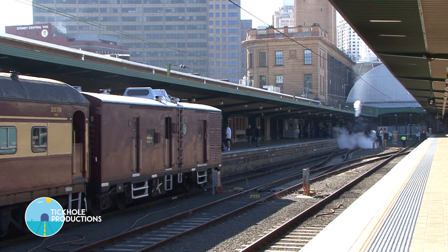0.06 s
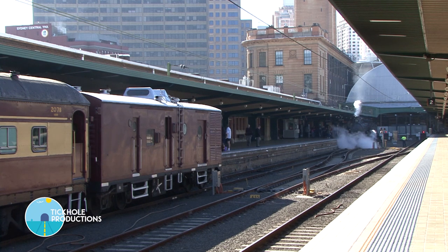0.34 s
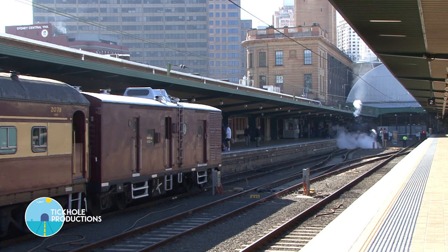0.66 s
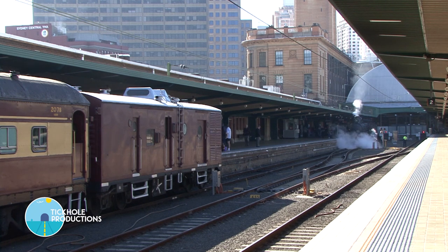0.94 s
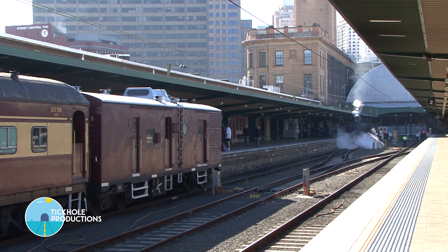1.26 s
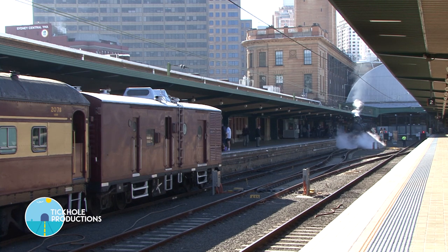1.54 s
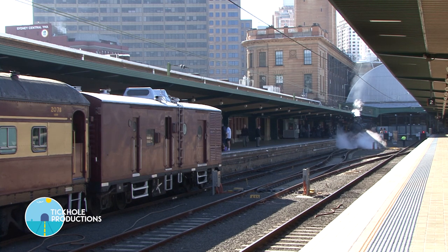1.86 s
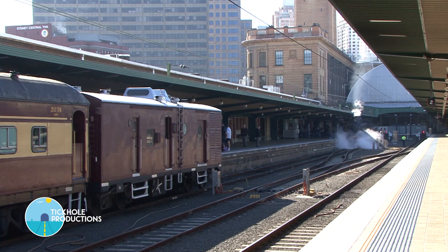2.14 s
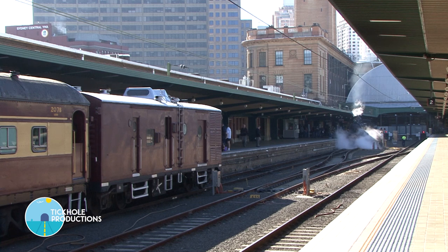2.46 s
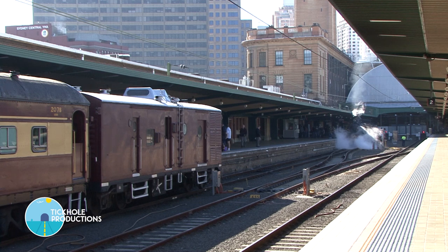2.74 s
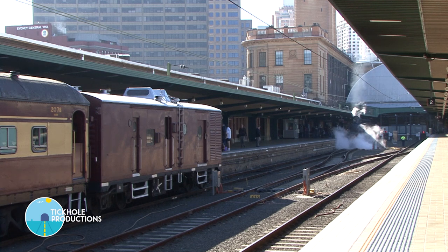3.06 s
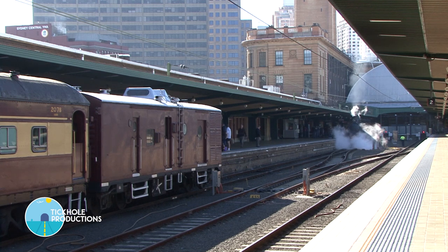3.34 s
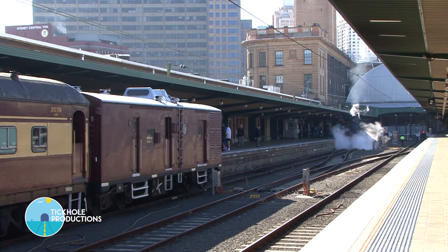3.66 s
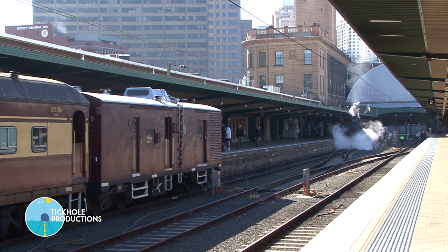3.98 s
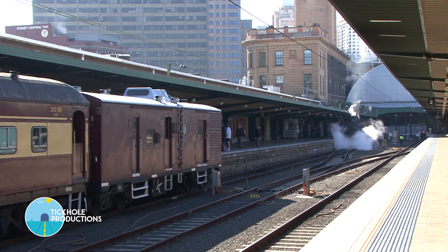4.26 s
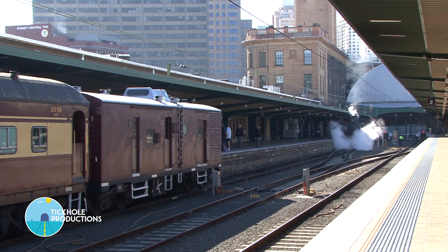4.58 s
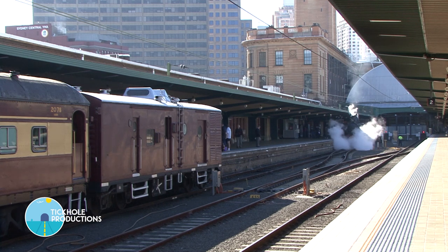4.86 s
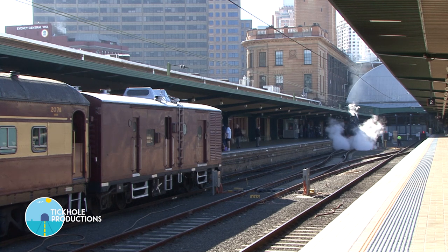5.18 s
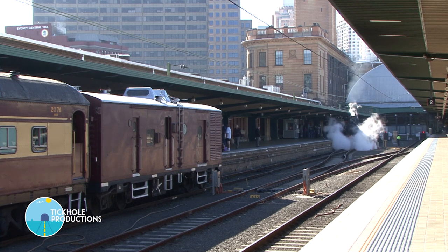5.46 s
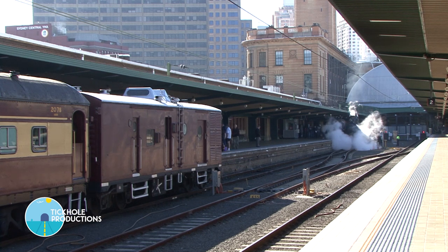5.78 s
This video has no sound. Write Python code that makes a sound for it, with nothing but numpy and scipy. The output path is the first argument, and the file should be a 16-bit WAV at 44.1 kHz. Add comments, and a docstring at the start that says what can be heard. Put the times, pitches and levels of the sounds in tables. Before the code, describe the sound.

A steam locomotive hisses steadily some way off over a dull station roar, with a few soft knocks and short squeals.

```python
"""A hiss of steam is heard first: a locomotive some way off creeps along a platform, cylinder drains open.
The turbulent jet excites outlet resonances that shift, swell and fade in turn, over the dull roar and
electrical hum of the station. Short squeals, soft knocks of the running gear and puffs of wind on the
microphone follow. Near two seconds a thin whistle swells once, then fine spray bursts out twice."""
import sys
import numpy as np
from scipy import signal
from scipy.fft import rfft, irfft, next_fast_len
from scipy.io import wavfile

SR = 44100
rng = np.random.default_rng(int(sys.argv[2]) if len(sys.argv) > 2 else 0)


def store_pcm(level_fs):
    """Save levels as 16-bit WAV."""
    pcm = np.round(np.clip(level_fs, -1, 1) * 32767).astype(np.int16)
    wavfile.write(sys.argv[1], SR, np.atleast_2d(pcm).T)


N = 256662
TIME = np.arange(N) / SR
FROM_MIDDLE_S = TIME - TIME.mean()


def from_db(db):
    """Amplitude ratio of a level in decibels."""
    return 10 ** (np.asarray(db) / 20)


def unit_rms(x):
    """Normalisation to unit mean power."""
    return x / np.sqrt(np.mean(x ** 2) + 1e-20)


def level_curve(rows):
    """Linear interpolation of (t/s, level/dB) rows at every sample."""
    return np.interp(TIME, *np.transpose(rows))


def swing_of(rows):
    """Deviation of a level curve from its mean, in dB."""
    level = level_curve(rows)
    return level - level.mean()


def swell(peak_s, length_s):
    """Gaussian envelope of height 1; the length is its full width at half height."""
    return .5 ** ((2 * (TIME - peak_s) / length_s) ** 2)


def noise(gain_at):
    """Spectral shaping: white noise weighted by a function of frequency, at unit rms."""
    size = next_fast_len(N)
    hz = np.arange(size // 2 + 1) * SR / size
    white = rfft(rng.standard_normal(size))
    return unit_rms(irfft(white * gain_at(hz), size)[:N])


def coloured(spectrum):
    """Noise shaped by (f/Hz, level/dB) rows, interpolated in log frequency."""
    points_hz, db = np.transpose(spectrum)
    return noise(lambda hz: from_db(np.interp(np.log(hz + 1), np.log(points_hz), db)))


def resonant(centre_hz, width_hz):
    """Narrow-band noise: two passes through one second-order resonance."""
    return noise(lambda hz: 1 / (1 + ((hz ** 2 - centre_hz ** 2) / (hz * width_hz + 1)) ** 2))


def drift(rate_hz):
    """Random fluctuation: low-pass noise of unit rms."""
    return noise(lambda hz: 1 / (1 + (hz / rate_hz) ** 2))


def gliding(centre_hz, width_hz):
    """Quadrature modulation: two slow noises on a moving carrier form a gliding band of noise."""
    phase = 2 * np.pi * np.cumsum(centre_hz) / SR
    return unit_rms(drift(width_hz / 2) * np.cos(phase) + drift(width_hz / 2) * np.sin(phase))


def split(x, centres_hz):
    """Complementary filter bank: overlapping bands that sum to the input."""
    size = next_fast_len(N)
    spectrum = rfft(x, size)
    log_hz = np.log(np.arange(size // 2 + 1) * SR / size + 1)
    weights = [np.interp(log_hz, np.log(centres_hz), row) for row in np.eye(len(centres_hz))]
    return [irfft(spectrum * weight, size)[:N] for weight in weights]


# Spectrum of the bare jet: f/Hz, relative density level/dB
JET_SPECTRUM = [(300, -36.5), (700, -20.5), (1100, -11.5), (1600, -7.5), (2650, -5), (3700, -1), (4800, -2),
                (6000, -2.2), (8000, -8), (10000, -16), (12500, -24.5), (14500, -32.5), (16000, -44)]
# Strength of the steam flow: t/s, relative level/dB
FLOW_LEVEL = [(0.06, -19), (1.0, -17), (1.85, -16.5), (2.4, -16.5), (2.53, -16), (3.83, -14), (4.82, -19),
              (5.13, -19), (5.82, -16.5)]
# Treble of the jet: t/s, relative level/dB
SIZZLE_LEVEL = [(0.0, -29), (0.31, -31.5), (1.0, -27), (2.3, -27.5), (2.63, -29), (3.34, -28), (3.79, -35),
                (4.03, -32.5), (4.93, -33), (5.27, -29), (5.66, -32), (5.82, -32)]
def jet(level_db=-19.5, trend_db_per_s=-0.35, body_hz=1200, hiss_hz=4800, sizzle_hz=10000):
    """Turbulent mixing radiates a broad hiss that follows the flow; moving air makes each band flutter."""
    body_db = 0.24 * swing_of(ROAR_LEVEL)   # the low bands rise and fall with the station's roar
    hiss_db = 0.9 * swing_of(FLOW_LEVEL)
    sizzle_db = 1.04 * swing_of(SIZZLE_LEVEL)
    surge_db = 0.45 * drift(22)
    centres_hz = np.geomspace(700, 14000, num=14)
    out = 0
    for hz, band in zip(centres_hz, split(coloured(JET_SPECTRUM), centres_hz)):
        low = np.interp(hz, [body_hz, hiss_hz], [1, 0])
        high = np.interp(hz, [hiss_hz, sizzle_hz], [0, 1])
        middle = min(1 - high, 1 - low / 2)
        swing_db = low * body_db + middle * hiss_db + high * sizzle_db
        flutter_db = 0.67 * np.sqrt(hz / hiss_hz) * drift(14)   # short waves are scattered most
        out = out + band * from_db(swing_db + surge_db + flutter_db)
    return from_db(level_db + trend_db_per_s * FROM_MIDDLE_S) * out


# Outlet resonances: f/Hz, bandwidth/Hz, base level at mid-scene/dB, trend as the engine creeps/(dB/s)
OUTLET_MODES = [(1901, 310, -31.7, 1.55), (2329, 450, -32.3, .2), (3160, 610, -26.6, .85),
                (3675, 690, -33, .5), (4424, 540, -27, 0.9), (5190, 490, -27.1, 0.4), (5956, 930, -30, 0)]
# The flow catches the nearest resonance: peak t/s, duration/s, f it is pulled to/Hz, lift/dB
MODE_SWELLS = [(.3, .5, 4480, 3.5), (.75, .65, 3060, 3.5), (1.35, .45, 3960, 7), (1.5, 0.69, 2761, 1),
               (1.25, .25, 5195, 3), (1.85, .55, 5140, 6.5), (1.88, .5, 5850, 7), (2.02, .35, 4220, 2),
               (2.501, .55, 2300, 6), (2.724, 0.53, 5190, 7), (2.868, .5, 4315, 5.6),
               (3.332, .3, 2225, 7.5), (3.368, .22, 5253, 2.5), (3.6, .6, 3110, 5.5),
               (3.801, .45, 3740, 7.5), (4.15, .4, 3020, 3), (4.27, 0.311, 2330, 6),
               (4.622, .55, 1945, 3.5), (5.25, .6, 4300, 6.3), (5.47, .6, 3164, 3.7)]
def outlets(wander_share=.004, wander_hz=1.5, flutter_db=0.86):
    """Flow-excited resonance: steam sounds the outlet modes, lifting each in turn and pulling its pitch."""
    modes_hz = np.array(OUTLET_MODES)[:, 0]
    flow_db = 0.49 * swing_of(FLOW_LEVEL)
    out = 0
    for mode, (rest_hz, width_hz, rest_db, trend) in enumerate(OUTLET_MODES):
        hz = rest_hz * (1 + wander_share * drift(wander_hz))
        db = rest_db + flow_db + trend * FROM_MIDDLE_S + flutter_db * drift(9.3)
        for peak_s, length_s, pulled_hz, lift_db in MODE_SWELLS:
            if np.argmin(np.abs(modes_hz - pulled_hz)) == mode:
                caught = swell(peak_s, length_s)
                hz = hz + (pulled_hz - rest_hz) * caught
                db = db + lift_db * caught
        out = out + from_db(db) * gliding(hz, width_hz)
    return out


def canopy(direct, echo_db=-21, earliest_s=.002, latest_s=.025, count=8):
    """Comb filtering: reflections from platform, roof and carriages interfere with the direct sound."""
    lags = (rng.uniform(earliest_s, latest_s, count) * SR).astype(int)
    echoes = sum(np.roll(direct, lag) for lag in lags)
    gain = from_db(echo_db)
    return (direct + gain * echoes) / np.sqrt(1 + count * gain ** 2)


# Dull roar under the station roof: t/s, relative level/dB
ROAR_LEVEL = [(0, -41.5), (1.4, -40.5), (3.3, -43.5), (3.7, -48.5), (5.15, -46), (5.82, -46.5)]
# Spectrum of the roar: f/Hz, relative density level/dB
ROAR_SPECTRUM = [(20, -28), (60, -26), (95, -15), (140, -4.5), (240, -5), (340, 1.5), (450, -0.5),
                 (600, 2.5), (850, -2), (1500, -10), (4000, -50)]
# Drones of steady pitch: f/Hz, bandwidth/Hz, relative level/dB
DRONES = [(197, 25, -63.5), (356, 19, -56.5), (543, 17, -53.5), (1030, 68, -50.5)]
def station():
    """Incoherent addition: a broad roar, with drones, electrical hum and rumble that swell with it."""
    roar = from_db(level_curve(ROAR_LEVEL) - 1.0) * coloured(ROAR_SPECTRUM)
    drones = sum(from_db(db - 1.6) * resonant(hz, width_hz) for hz, width_hz, db in DRONES)
    hum = from_db(-57.5) * resonant(centre_hz=290.8, width_hz=6.7)
    rumble = from_db(-63.5) * resonant(centre_hz=130, width_hz=100)
    return roar + from_db(0.79 * swing_of(ROAR_LEVEL)) * (drones + hum + rumble)


# Short squeals: onset t/s, duration/s, first f/Hz, last f/Hz, level/dB
SQUEALS = [(1.156, 0.085, 1547, 1520, -33.5), (1.28, 0.15, 1390, 1403, -37), (1.972, 0.12, 1434, 1385, -33),
           (2.11, 0.18, 1400, 1400, -33.5), (3.975, 0.14, 884, 980, -43), (4.2, 0.41, 1420, 1430, -41),
           (4.527, 0.109, 816, 973, -45), (4.59, 0.18, 735, 743, -45)]
def squeals(waver_hz=24, rough_db=2.5):
    """Random frequency and amplitude modulation makes short gliding tones waver and sound rough."""
    waver = waver_hz * drift(55.7)
    roughness = from_db(rough_db * drift(35))
    out = 0
    for onset_s, length_s, first_hz, last_hz, db in SQUEALS:
        progress = np.clip((TIME - onset_s) / length_s, 0, 1)
        hz = first_hz + (last_hz - first_hz) * progress + waver
        envelope = from_db(db) * np.sqrt(2 * np.abs(np.sin(np.pi * progress)))
        out = out + envelope * np.sin(2 * np.pi * np.cumsum(hz) / SR)
    return out * roughness


# Knocks of the running gear: onset t/s, level/dB, time to decay by 60 dB/s
KNOCKS = [(1.19, -36, .6), (1.245, -36.5, 0.58), (1.75, -30.5, 0.5), (2.02, -34, 0.73), (2.86, -36, 0.53),
          (3.35, -35.5, 0.52), (5.43, -49, 0.71), (5.62, -40, 0.49)]
# Modes of the locomotive's frame: f/Hz, bandwidth/Hz, relative level/dB
FRAME_MODES = [(85, 40, -17), (170, 130, -11), (298, 46, -7), (362, 25, -0.5), (433, 48, -2.5),
               (553, 22, 2), (726, 240, 3.5), (1030, 100, 3.5)]
def knocks(rise_s=0.011):
    """Impact excitation: far blows ring the frame's modes, smeared by the roof into decaying swells."""
    ringing = unit_rms(sum(from_db(db) * resonant(hz, width_hz) for hz, width_hz, db in FRAME_MODES))
    envelope = 0
    for onset_s, db, t60 in KNOCKS:
        age = np.maximum(TIME - onset_s, 0)
        rise = 1 - np.exp(-age / rise_s)
        envelope = envelope + rise * from_db(db - 60 * age / t60)
    return envelope * ringing


# Eddies of wind at the microphone: t/s, level/dB
PUFFS = [(1.365, -51), (1.478, -45), (1.54, -44), (1.978, -42), (2.105, -44), (2.57, -45), (2.79, -48),
         (3.285, -43), (3.4, -50), (4.14, -44), (5.175, -47), (5.45, -47)]
def wind(puff_s=0.012, gust_s=.55, gust_relative_db=-26):
    """Pseudo-sound: each eddy's pressure pushes the diaphragm in and out once, amid a faint rumbling gust."""
    puffs = gusts = 0
    for centre_s, db in PUFFS:
        lead = (centre_s - TIME) / puff_s
        puffs = puffs + from_db(db) * 2 * lead * np.exp(-lead ** 2)
        gusts = gusts + from_db(db + gust_relative_db) * swell(centre_s, gust_s)
    return puffs + gusts * resonant(centre_hz=20, width_hz=35)


def whistle(level_db=-26.5):
    """Flow-excited resonance at the drain: a thin, high band of noise swells once."""
    envelope = from_db(level_db) * swell(peak_s=2.01, length_s=.24)
    return envelope * resonant(centre_hz=7340, width_hz=650)


# Bursts of spray from the drains: peak t/s, duration/s, level/dB
SPRAY_BURSTS = [(2.31, 0.16, -31.5), (2.54, 0.18, -34.5)]
# Spectrum of the spray: f/Hz, relative density level/dB
SPRAY_SPECTRUM = [(5000, -34), (8500, 4), (11500, 2), (13500, -2), (16000, -15)]
def spray():
    """Atomisation: condensed water torn into mist gives short bursts of very bright hiss."""
    envelope = sum(from_db(db) * swell(peak_s, length_s) for peak_s, length_s, db in SPRAY_BURSTS)
    return envelope * coloured(SPRAY_SPECTRUM)


def scene():
    """Superposition: all sources add at one microphone, alike in both channels."""
    steam = canopy(jet() + whistle() + outlets() + spray())
    mono = steam + station() + knocks() + squeals() + wind()
    return np.array([mono, mono])


def record(dry, cutoff_hz=15700):
    """Band limiting: an elliptic low-pass filter cuts the highest treble steeply."""
    return signal.sosfilt(signal.ellip(12, .1, 80, cutoff_hz, fs=SR, output="sos"), dry)


dry = scene()
out = record(dry)
store_pcm(out)
```